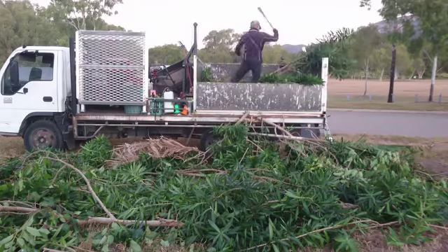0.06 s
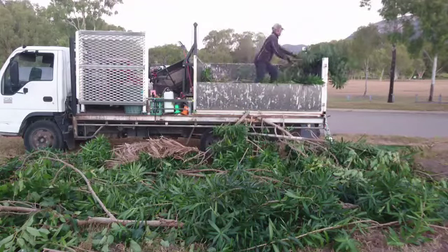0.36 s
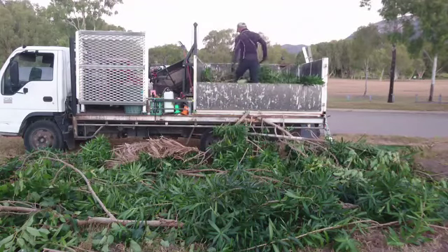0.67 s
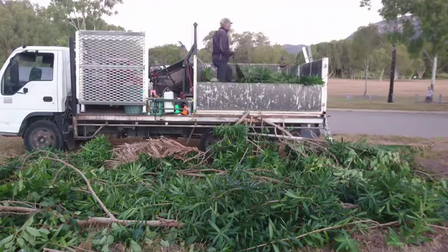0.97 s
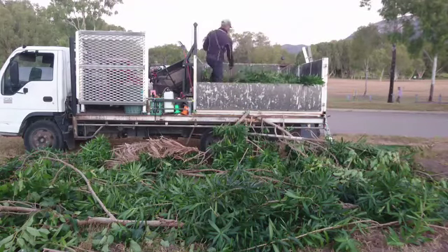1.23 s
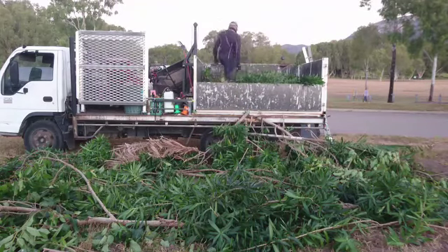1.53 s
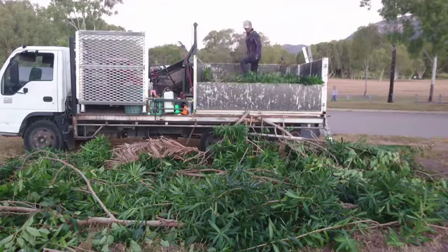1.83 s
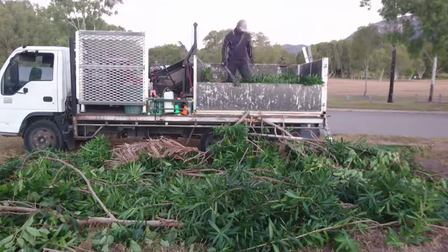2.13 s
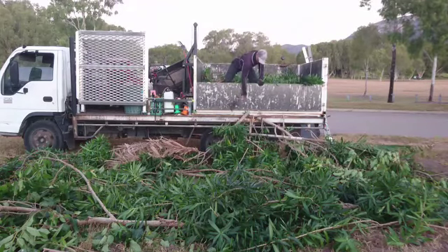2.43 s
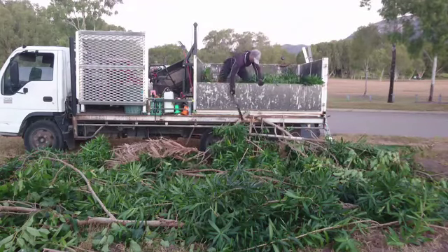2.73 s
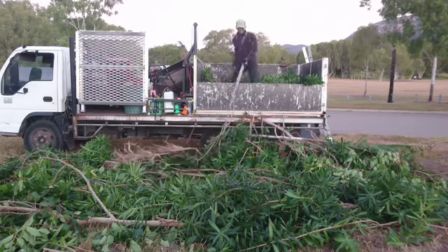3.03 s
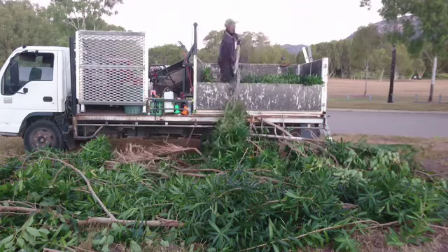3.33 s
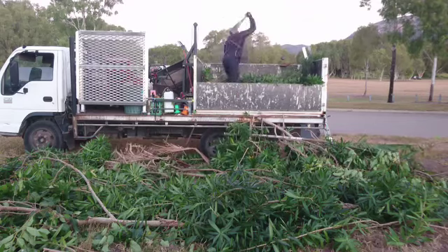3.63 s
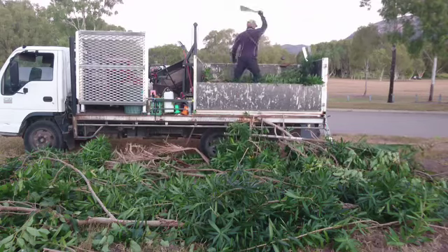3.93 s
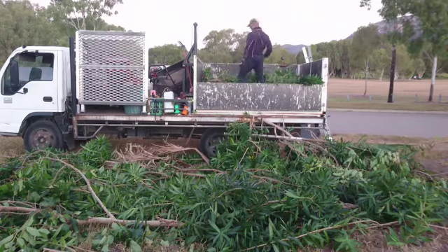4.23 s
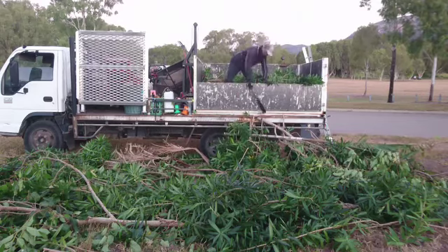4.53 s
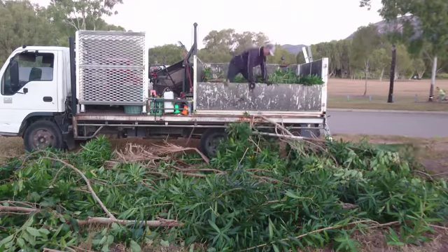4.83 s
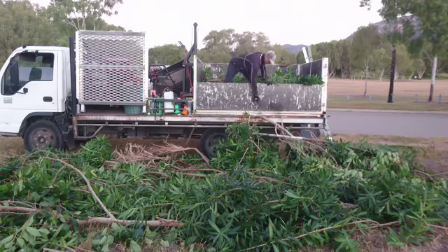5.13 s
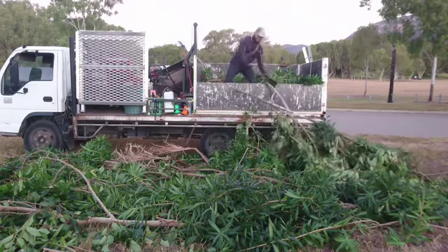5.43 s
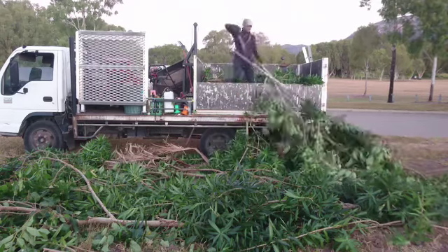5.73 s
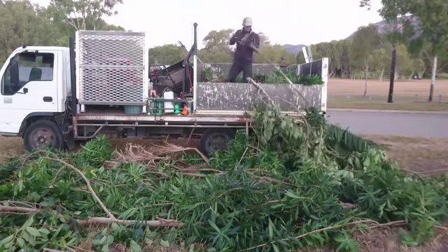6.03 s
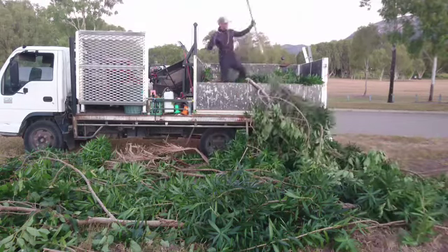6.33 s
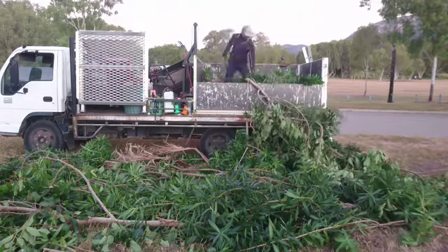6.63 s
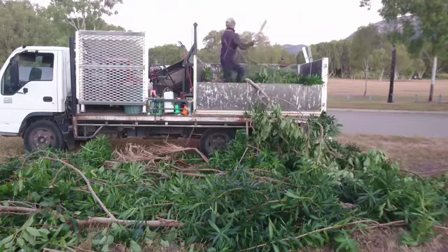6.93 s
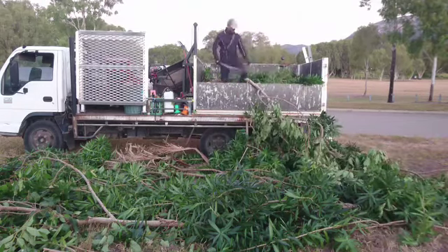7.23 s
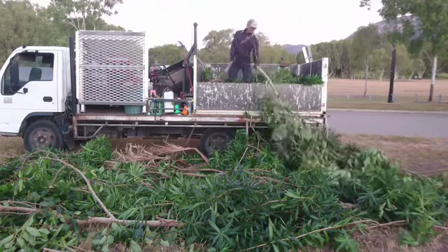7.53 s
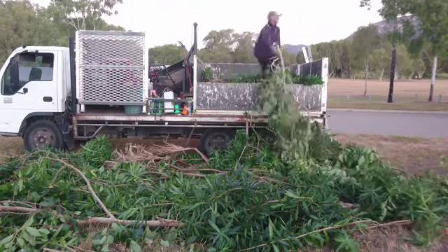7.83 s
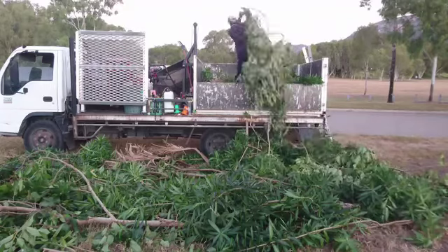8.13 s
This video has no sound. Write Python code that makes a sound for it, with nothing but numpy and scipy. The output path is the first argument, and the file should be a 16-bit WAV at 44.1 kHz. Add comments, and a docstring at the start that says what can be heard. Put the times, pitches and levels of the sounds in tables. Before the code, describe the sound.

A machete chops leafy branches on an open truck bed, heard from some metres away. Stems snap sharply, then dragged leaves rustle with faint squeaks. Wood knocks on the bed and the steel blade pings briefly. More scattered snaps bring another knock and a second ping. Toward the end, snaps, knocks and rustling crowd together, closing with a few quick knocks over a low rush of outdoor air.

```python
"""A worker chops leafy branches with a machete on an open truck bed, outdoors, some metres away.
Over a low rush of open air, a faint hum fades as the first stems snap, fibre by fibre. Dragged leaves
rustle and squeak softly. Just after 2 s wood knocks on the bed, then the steel blade pings; it pings
again shortly before 5 s. From 6 s snaps, knocks and the rustle of leaves being packed down crowd
together, and a last few knocks end the scene."""
import sys
import numpy as np
from scipy import signal
from scipy.fft import rfft, irfft, next_fast_len
from scipy.io import wavfile
from scipy.ndimage import uniform_filter1d

SR = 44100
rng = np.random.default_rng(int(sys.argv[2]) if len(sys.argv) > 2 else 0)


def store_wav(level_fs):
    """Save 16-bit WAV to argv[1]."""
    pcm = np.round(np.clip(np.atleast_2d(level_fs), -1, 1) * 32767)
    wavfile.write(sys.argv[1], SR, pcm.T.astype(np.int16))


N = 365588
TIME = np.arange(N) / SR
HIT_TIME = np.arange(4096) / SR  # seconds since the start of one short sound
FFT_SIZE = next_fast_len(N, real=True)

# stems that snap: start_s, break_ms, level_db, branch_body_db, brightness_db, stem_pitch_hz
STEM_SNAPS = [(.143,5.5,-42,-51.5,2.5,7980), (.649,5.3,-47,-56.5,3,9700), (0.8035,3.5,-40.5,-55,5.5,3250),
              (1.1259,1.8,-37,-43.5,2.5,4980), (1.905,2.5,-61.5,-64,3.5,4170), (2.02,4.7,-60,-79,0,5170),
              (2.31,4.6,-53,-52.5,-0.5,4730), (2.4032,5,-47.5,-56.5,3.5,5960), (2.4898,3,-49,-57,4,5800),
              (2.5754,3.5,-51.5,-49.5,-1.7,5370), (2.7389,2.2,-39.5,-42,0.5,7450),
              (3.038,5,-62,-80,2.5,11000), (3.3269,4.2,-39,-50,3,4030), (3.529,6.3,-56,-63,3,10700),
              (3.6932,2.1,-44,-52,-0.9,11100), (3.9951,5.8,-45,-52.5,2.5,4660),
              (4.1323,4.1,-66,-82,7,10300), (4.516,4.1,-63.5,-75,-4,4700), (4.641,7.7,-49.5,-54.5,4.7,5970),
              (4.719,2.7,-62,-79,3.5,5850), (4.771,16,-57.5,-69,8,5570), (4.9547,3.8,-41,-58,8,7200),
              (5.0595,3.1,-53.5,-54,3.5,7450), (5.1586,5,-46.5,-46,1.5,5140), (5.6248,2.5,-52.5,-84,4,4900),
              (6.101,4.4,-51.5,-56,2,3820), (6.216,3.5,-56,-57.5,1.5,3780), (6.278,4,-64.5,-75,2,3770),
              (6.35,15,-57,-57,2,5740), (6.4217,4.6,-50.5,-58,3.5,7640), (6.56,6.7,-55.5,-54.5,4.5,3720),
              (7.023,5.3,-46.5,-62,3,7450), (7.2,18,-55,-44.5,1.5,3130), (7.502,8.1,-57.5,-68,2,7140)]


def gain(db):
    """Turn decibels into a number to multiply by."""
    return 10 ** (np.asarray(db) / 20)


def rms(x):
    """The average strength of a sound (root mean square)."""
    return np.sqrt(np.mean(x ** 2))


def at_level(x, db):
    """Scale a short sound so that its energy, spread over 10 ms, has this level."""
    return x * gain(db) / np.sqrt(np.sum(x ** 2) / (SR / 100))


def add(out, start_s, x):
    """Mix x into out from start_s on."""
    i = max(int(start_s * SR), 0)
    out[i:i + len(x)] += x[:N - i]


def band(x, low_hz, high_hz, order=3):
    """Keep the part of a sound between two frequencies."""
    edges_hz = [low_hz, min(high_hz, SR / 2 - 1)]
    return signal.sosfilt(signal.butter(order, edges_hz, "band", fs=SR, output="sos"), x)


def spectrum(points):
    """Join (frequency_hz, level_db) points into a gain for every frequency."""
    hz, db = np.transpose(points)
    return gain(np.interp(np.log(np.fft.rfftfreq(FFT_SIZE, 1 / SR) + 1), np.log(hz), db))


def colour(x, points):
    """Shape the lows and highs of a sound; the result has strength 1."""
    shaped = irfft(rfft(x, FFT_SIZE) * spectrum(points), FFT_SIZE)[:N]
    return shaped / rms(shaped)


def curves(table):
    """Draw each column as straight lines over the times in the first column."""
    times_s, *columns = np.transpose(table)
    return [np.interp(TIME, times_s, column) for column in columns]


def wander(rate_hz):
    """A random curve of strength 1 that heads for a new value rate_hz times a second."""
    step = int(SR / rate_hz)
    curve = uniform_filter1d(np.repeat(rng.standard_normal(N // step + 1), step), step)[:N]
    return curve / rms(curve)


def ring(tones, detune):
    """A struck object's tones, each a little off pitch and fading by 60 dB in its ring_s."""
    out = 0
    for pitch_hz, level_db, ring_s in tones:
        hz = pitch_hz * (1 + detune * rng.standard_normal())
        fade = np.exp(-np.log(1000) * HIT_TIME / ring_s)
        out += gain(level_db) * np.sin(2 * np.pi * hz * HIT_TIME) * fade
    return out


def crackle(size, spread_db):
    """Dense tiny clicks of very unequal size, at strength 1."""
    clicks = rng.standard_normal(size) * gain(spread_db * np.minimum(rng.exponential(size=size), 6))
    return clicks / rms(clicks)


def whistles(count=700, length_s=0.1478, rise=0.0855):
    """Many overlapping whistles that each drift upward, at strength 1."""
    out, size = np.zeros(N), int(length_s * SR)
    swell = np.hanning(size)
    glide = 2 * np.pi * np.cumsum(np.linspace(1, 1 + rise, size)) / SR
    for when, pitch in rng.random((count, 2)):
        hz = 380 * 5 ** pitch
        add(out, when * N / SR, swell * np.sin(hz * glide))
    return out / rms(out)


def outdoors(bundle_db, air_db=-68.5):
    """Steady open air and a low, slightly whistling rush that swells when a bundle of branches shifts."""
    # loudness of the distant rush: time_s, level_db
    rush_levels = [(0, -63.5), (1.8, -67.5), (2.7, -65), (4, -67.5), (5.5, -68.5), (8.29, -70)]
    # tone of the rush: frequency_hz, level_db
    rush_colour = [(150, -28.5), (260, -22), (330, -6.5), (420, -0.5), (560, 2.5), (820, 2.5), (1050, -4),
                   (1300, -10.5), (1900, -58)]
    # tone of the still air: frequency_hz, level_db
    air_colour = [(25, -17.5), (60, -38), (150, -30.5), (240, -37), (330, -21), (450, 0.5), (850, -9.5),
                  (1200, -5.5), (2000, -27), (2900, -7), (3800, -9), (13000, -17.5), (15000, -22),
                  (16000, -34)]
    distant_db, = curves(rush_levels)
    rush = colour(rng.standard_normal(N), rush_colour) + gain(0.5) * colour(whistles(), rush_colour)
    swell = np.hypot(gain(distant_db), gain(bundle_db)) * gain(2.07 * wander(25))
    air = colour(rng.standard_normal(N), air_colour) * gain(air_db + 0.97 * wander(4.6))
    return rush / rms(rush) * swell + air


def hum(pitch_hz=460):
    """A faint distant tone that wavers and is gone after half a second."""
    # loudness of the hum: time_s, level_db
    level_db, = curves([(0, -70), (.15, -65), (.33, -62.5), (.42, -74), (.5, -130)])
    loudness = np.sqrt(2) * gain(level_db + wander(17))
    hz = pitch_hz * (1 + 0.0021 * wander(20.5))
    return loudness * np.sin(2 * np.pi * np.cumsum(hz) / SR)


def squeaks(width_hz=700):
    """Thin, unsteady rising squeaks whose overtones are strongest near one frequency."""
    # faint squeaks: start_s, length_s, start_pitch_hz, end_pitch_hz, strongest_hz, level_db
    events = [(0.696,0.13,834,966,3800,-64), (0.934,0.17,970,1154,1100,-62.5), (0.962,.1,990,1070,3100,-61),
              (1.101,0.27,550,618,600,-54), (1.233,0.17,850,915,3500,-56.5),
              (2.238,0.12,778,860,3250,-64.5), (2.6,0.24,800,860,800,-66.5), (2.601,0.19,792,893,3400,-64),
              (2.62,.11,1440,1470,4400,-66), (5.452,.089,880,985,3700,-71), (7.281,0.16,896,985,3670,-66.5)]
    out, wobble, flicker = np.zeros(N), wander(250), wander(110)
    for start_s, length_s, start_hz, end_hz, strongest_hz, level_db in events:
        first, size = int(start_s * SR), int(length_s * SR)
        span = slice(first, first + size)
        hz = np.linspace(start_hz, end_hz, size) * (1 + .008 * wobble[span])
        phase = 2 * np.pi * np.cumsum(hz) / SR
        tone = 0
        for k in range(1, 6):
            weight = 0.15 + np.exp(-((k * hz - strongest_hz) / width_hz) ** 2)
            tone += weight * np.sin(k * phase)
        tone *= gain(4 * flicker[span])
        add(out, start_s, tone / rms(tone) * signal.windows.tukey(size, .5) * gain(level_db))
    return out


def twig_ticks(count=420, spread_db=5):
    """Small twigs and leaf stalks flick at random, each with its own brief ring."""
    out, t = np.zeros(N), HIT_TIME[:512]
    for when, pitch, chance in rng.random((count, 3)):
        hz = 2800 * 2 ** (2.2 * pitch)
        ping = np.sin(2 * np.pi * hz * t) * np.exp(-t / .0012)
        click = .7 * rng.standard_normal(len(t)) * np.exp(-t / .0008)
        add(out, when * N / SR, (ping + click) * gain(-spread_db * np.log(max(chance, .03))))
    return out / rms(out)


def pile_levels(roundness=1.34, settle_s=0.045):
    """Moves and snaps stir the pile: gives dB curves for leaves, crisp highs, twigs and low rush."""
    # a branch is dragged, thrown or pressed down (the last three levels are added to leaves_db):
    # peak_s, rise_s, fall_s, leaves_db, crisp_db, twigs_db, rush_db
    moves = [(.005,.02,0.015,-55,-0.5,-9,-6), (.31,0.023,.05,-68,-0.5,-8,1), (.48,0.14,0.27,-67,0.5,-7,-15),
             (.79,0.12,0.2,-64.5,0,-3,1.5), (1.03,0.13,0.22,-55,-3,-3,-6.5),
             (1.165,0.078,0.06,-47,1,-3.5,-8), (1.275,0.15,0.089,-53,-5.5,3.5,1.5),
             (1.375,0.057,0.054,-51,-7,-4,-18), (1.53,0.23,0.19,-65.5,3.5,2.5,3.5),
             (1.78,0.25,0.21,-70.5,4,-7.5,-18), (2.04,.03,.03,-64,1.5,-19,-12),
             (2.2,0.075,0.1,-64.5,-6,-6,5), (2.69,.07,.07,-73,-17,-3,-10),
             (3.02,0.087,0.076,-64.5,5,-12,-19), (3.21,0.075,.05,-70,6.5,-19,-15),
             (3.415,0.12,0.037,-64,3.5,-15,-17), (3.54,0.036,0.032,-64,-2,-6,4.5),
             (3.93,.03,0.096,-75.5,4,-6,-10), (4.15,.05,.08,-79,6,-9,-8), (4.41,0.2,0.15,-71.5,-2,-7,-14),
             (4.791,0.0069,0.029,-57,-8,-7,-2.5), (5.3,0.056,0.088,-64.5,-0.5,-10,-20),
             (5.73,.04,0.087,-64,3.5,-6,2.5), (5.98,0.029,0.055,-71.5,-1,-3.5,-8),
             (6.18,0.053,0.048,-58,0.5,-5,-9), (6.355,0.043,0.037,-61,1.5,-3,-15),
             (6.5,0.044,0.054,-62,-0.5,-6.5,-4), (6.744,0.028,0.057,-55.5,-0.5,-16,-15),
             (6.88,0.11,.09,-66,-0.5,-13,-0.5), (7.11,.05,0.15,-75.5,4,-10,-8),
             (7.32,.03,0.15,-61,-19,-17,-7), (7.47,0.11,0.16,-66,0,-16,-23), (7.62,.06,0.073,-61.5,2,-6,-4),
             (7.855,0.026,0.021,-61.5,-6,-2,3.5), (7.975,0.032,0.071,-55.5,4,-0.5,3),
             (8.15,0.12,0.095,-61,-1.5,-12,-6), (8.274,0.0093,0.016,-54,4,-9.5,-4.5)]
    # the pile at rest: leaves_db, crisp_db, twigs_db
    resting_db = [-76.5, -87, -82]
    # the pile shaken by a snap of 0 dB: leaves_db, crisp_db, twigs_db
    shaken_db = [-37, -46, -44.5]
    t = TIME[::64]
    power = np.full((4, len(t)), 1e-14)
    power[:3] += gain(resting_db)[:, None] ** 2
    for peak_s, rise_s, fall_s, leaves_db, *others_db in moves:
        swell = np.exp(-np.maximum((peak_s - t) / rise_s, (t - peak_s) / fall_s) ** roundness)
        power += np.outer(gain(leaves_db) * gain([0, *others_db]), swell) ** 2
    for start_s, _, snap_db, *_ in STEM_SNAPS:
        shake = gain(0.58 * snap_db) * gain(shaken_db)  # a harder snap shakes it somewhat more
        settle = (t > start_s) * np.exp(-abs(t - start_s) / settle_s)
        power[:3] += np.outer(shake, settle) ** 2
    return curves(np.column_stack([t, *10 * np.log10(power)]))


def foliage(leaves_db, crisp_db, twigs_db):
    """Countless touching leaves blend into a fluttering hiss; twigs tick, scrape and whine."""
    # tone of the leaves: frequency_hz, level_db
    leaf_colour = [(530, -22), (900, -2.5), (1090, -11.5), (1170, -4.5), (1250, -22.5), (1360, -11),
                   (1420, -9.5), (2070, -16.5), (2690, -9), (3430, -3), (4630, -1), (8150, -7.5),
                   (11600, -8.5), (14500, -7.5), (16000, -17.5)]
    buried_db = np.maximum(leaves_db + 56, 0)  # a dense rustle hides single twigs
    ticks = band(twig_ticks(), 2700, 16000) * gain(-9 - buried_db)
    hiss = colour(crackle(N, spread_db=-0.5), leaf_colour)
    rustle = hiss + ticks + gain(-15) * whistles()
    flutter_db = 1.48 * wander(130)
    out = 0
    for low_hz, high_hz, db in ((1100, 2507, twigs_db), (2790, 8220, leaves_db), (8050, SR / 2, crisp_db)):
        part = band(rustle, low_hz, high_hz, order=4)
        out += part / rms(part) * gain(flutter_db + db + .5 * wander(72))
    return out


def knocks(clatter_s=0.013):
    """A sharp blow, then a clatter of lighter touches, rings the truck bed, the branch and its bark."""
    # wood hits or scrapes the bed: start_s, contact_ms, bed_db, wood_db, bark_db, wood_pitch_ratio
    hits = [(0.821,21,-56.5,-49,-75,1.01), (2.036,14,-61.5,-59,-61,0.92), (2.135,1.2,-46,-36.5,-60,1.01),
            (2.223,2.6,-42,-38.5,-56.5,1.01), (3.057,11,-59,-55,-60.5,1.03),
            (3.3437,2.9,-73,-45.5,-47.5,1.11), (3.501,2.9,-57,-50.5,-68,0.95),
            (4.451,1.6,-46.5,-34.5,-60,1.05), (5.803,26,-58,-56.5,-61,1), (6.103,2.1,-43.5,-38,-46.5,1),
            (6.162,8.6,-66,-57,-55.5,1.1), (6.423,1.9,-59.5,-49.5,-53,0.96), (6.478,5.2,-65,-58,-56,1.03),
            (6.743,6.8,-66,-54.5,-50.5,1.1), (7.211,3.3,-41.5,-38,-54,0.68),
            (7.265,1.04,-43.5,-34.5,-54.5,0.97), (7.8989,0.53,-49,-41.5,-51.5,0.95),
            (8.097,2.4,-51.5,-42,-50,0.96), (8.1419,4.2,-45,-35.5,-42.5,1.017),
            (8.168,5.6,-49.5,-49.5,-60,0.97)]
    # tones of the booming bed, the wood and the bark: pitch_hz, level_db, ring_s
    bed_tones = [(436.5, 1, 0.12), (532, 12.5, 0.031), (682, 3.5, 0.028), (860, 11, 0.02)]
    wood_tones = [(1165, -8, 0.038), (1307, 5, 0.033), (1344, 6, 0.021), (1567, 0.5, 0.057),
                  (1732, -11.5, 0.092), (2004, -10, 0.043)]
    bark_tones = [(2530, -0.5, 0.003), (3250, -33, 0.0099), (3850, -1, 0.0051), (5670, 4, 0.0025)]
    out, t = np.zeros(N), HIT_TIME
    for start_s, contact_ms, bed_db, wood_db, bark_db, pitch_ratio in hits:
        branch_tones = [(pitch_ratio * hz, db, ring_s) for hz, db, ring_s in wood_tones]
        rise = np.minimum(t / (2 * contact_ms / 1000), 1)
        clatter = crackle(len(t), spread_db=2.7) * rise * np.exp(-t / clatter_s)
        clatter_db = -4 + 5 * np.log(contact_ms)  # a longer contact clatters more
        force = at_level(signal.unit_impulse(len(t)), 0) + at_level(clatter, clatter_db)
        for tones, db in ((bed_tones, bed_db), (branch_tones, wood_db), (bark_tones, bark_db)):
            ringing = signal.fftconvolve(force, ring(tones, detune=.014))[:len(t)]
            ringing = band(ringing, 0.97 * tones[0][0], 1.042 * tones[-1][0])
            add(out, start_s, at_level(ringing, db))
        thump = band(force, 39, 540, order=1)
        add(out, start_s, at_level(thump, wood_db - 34))
    return out


def blade():
    """The steel pings briefly, damped by the wood and the hand."""
    # cuts that ring the blade: start_s, level_db
    pings = [(2.74, -40), (3.255, -55), (4.643, -66), (4.72, -61), (4.772, -51.5), (4.954, -42.5)]
    # tones of the steel: pitch_hz, level_db, ring_s
    steel_tones = [(5640, 2, 0.11), (5870, 4, 0.075)]
    out = np.zeros(N)
    for start_s, level_db in pings:
        add(out, start_s, gain(level_db - 3) * ring(steel_tones, detune=.003))
    return out


def snaps(attack_s=.00044, release_s=.0011, splinter_s=.0105):
    """Fibres break one after another, splinters shiver on, and the stem adds its own pitch."""
    # a snap's four parts, from low to high (body, crack, bite, fizz): low_hz, high_hz
    parts = [(420, 1605), (2750, 4400), (4600, 8570), (9000, 15000)]
    centres_hz = np.sqrt(np.prod(parts[1:], axis=1))
    tails_db = [1.5, -8, -8, -8]  # the heavy body shakes for longer than the fibres
    out, t = np.zeros(N), HIT_TIME
    for start_s, break_ms, level_db, body_db, bright_db, stem_hz in STEM_SNAPS:
        # brightness trades crack for fizz; the part nearest the stem's pitch stands out
        tilt_db = np.array([-1.5 - bright_db, 0, -1.5 + bright_db])
        lift_db = 7.5 * np.exp(-(np.log2(centres_hz / stem_hz) / 0.31) ** 2)
        levels_db = [body_db, *(level_db + tilt_db + lift_db)]
        break_s = break_ms / 1000
        fade = np.exp(-t / (2 * break_s) - np.maximum(t - 0.95 * break_s, 0) / release_s)
        tearing = np.minimum(t / attack_s, 1) * fade
        shiver = np.minimum(t / break_s, 1) * np.exp(-t / splinter_s)
        stem_filter = signal.iirpeak(stem_hz, Q=9, fs=SR)
        for (low_hz, high_hz), db, tail_db in zip(parts, levels_db, tails_db):
            tail = at_level(shiver, tail_db - 0.6 * bright_db)  # a brighter snap breaks more cleanly
            fibres = crackle(len(t), spread_db=2) * np.hypot(at_level(tearing, 0), tail)
            snap = fibres + gain(6) * signal.lfilter(*stem_filter, fibres)
            add(out, start_s - .0003, at_level(band(snap, low_hz, high_hz, order=4), db))
        thump = band(rng.standard_normal(len(t)) * shiver, 25, 520, order=1)
        add(out, start_s, at_level(thump, body_db - 30))
    return out


def microphones(direct, scattered):
    """Two microphones share the direct sound, the right one louder; scattered sound differs in each."""
    # balance between the sides: frequency_hz, left_minus_right_db
    balance = [(60, -1), (150, -2.5), (300, -8.5), (600, -8), (1100, -7), (2000, -4.5), (5000, -1.5),
               (14000, -3)]
    # tone of the scattered sound: frequency_hz, level_db
    scatter_colour = [(60, -2), (150, 2), (350, -26), (1300, -10.5), (2200, -11), (4500, -5.5), (9000, -2),
                      (15000, -5.5)]
    shared = rfft(direct, FFT_SIZE)
    side = rfft(scattered, FFT_SIZE) * spectrum(scatter_colour)
    lean = np.sqrt(spectrum(balance))
    pair = np.array([(shared + side) * lean, (shared - side) / lean])
    return irfft(pair * 2 / (lean + 1 / lean), FFT_SIZE)[:, :N]


def scene():
    """All the work on the truck bed; fibres and leaves send a different sound in each direction."""
    *rustle_db, bundle_db = pile_levels()
    direct = snaps() + knocks() + blade() + foliage(*rustle_db) + outdoors(bundle_db) + squeaks() + hum()
    scattered = snaps() + foliage(*rustle_db) + outdoors(bundle_db)
    return microphones(direct, scattered)


def record(dry):
    """Cut away the highest treble, above 15600 Hz."""
    return signal.sosfilt(signal.ellip(8, .2, 60, 15600, fs=SR, output="sos"), dry)


dry = scene()
out = record(dry)
store_wav(out)
```